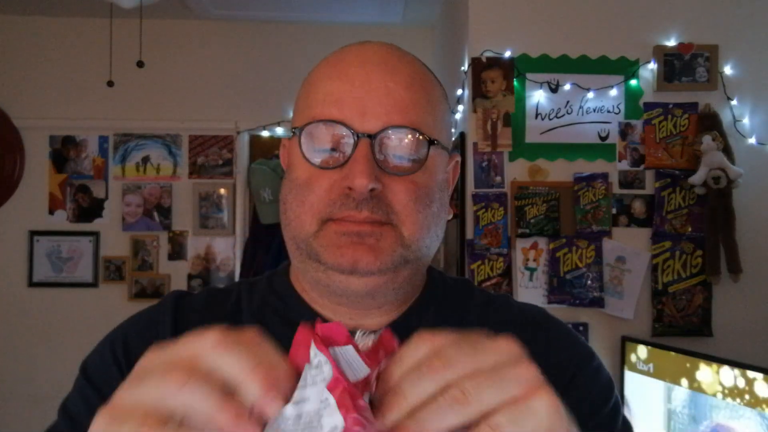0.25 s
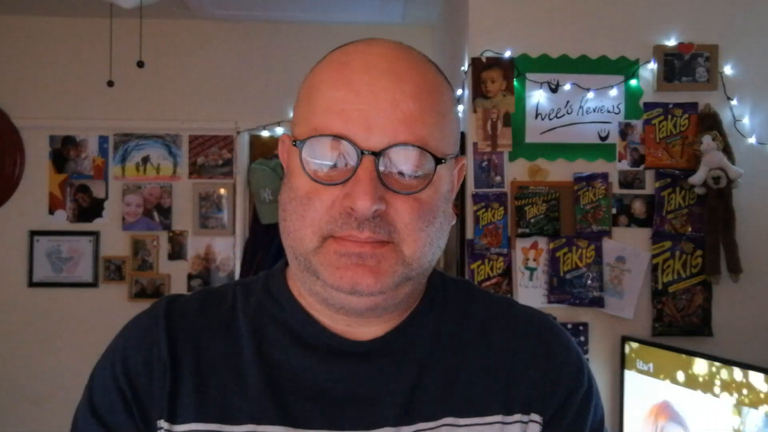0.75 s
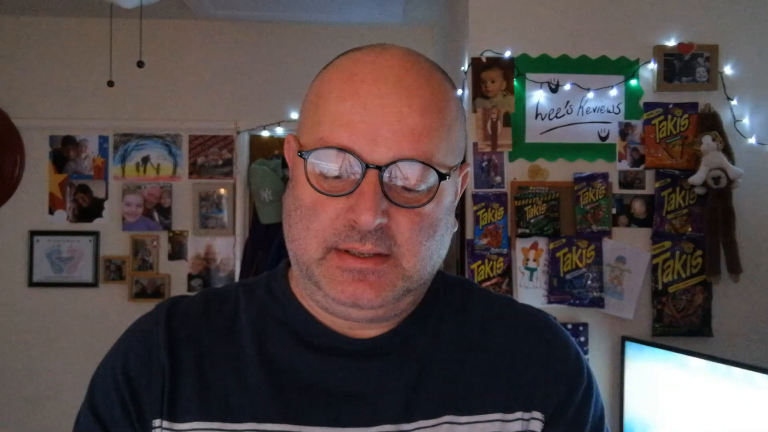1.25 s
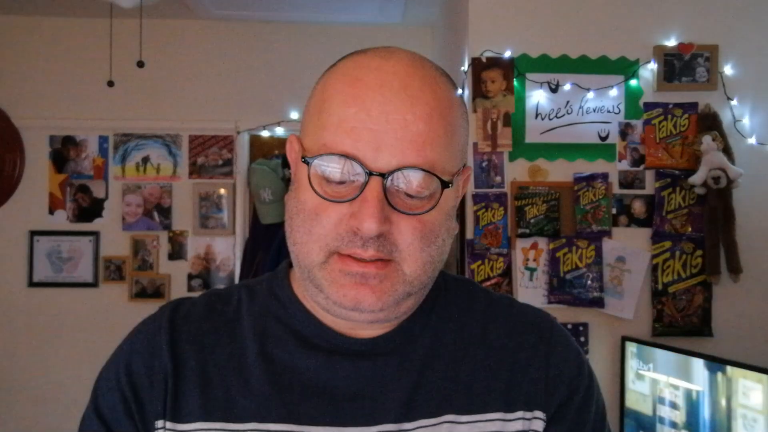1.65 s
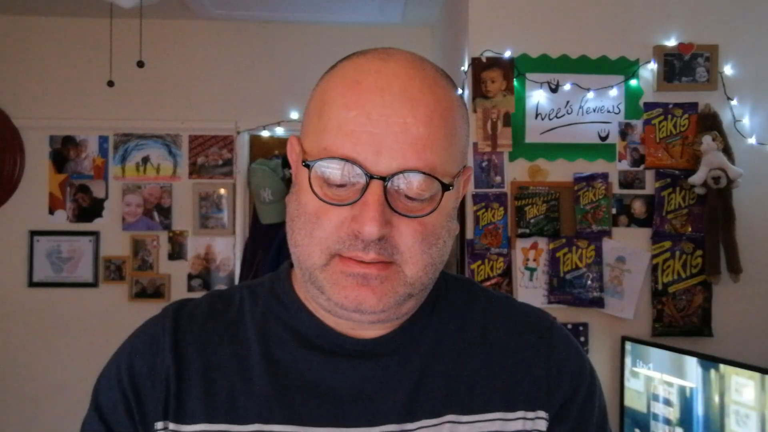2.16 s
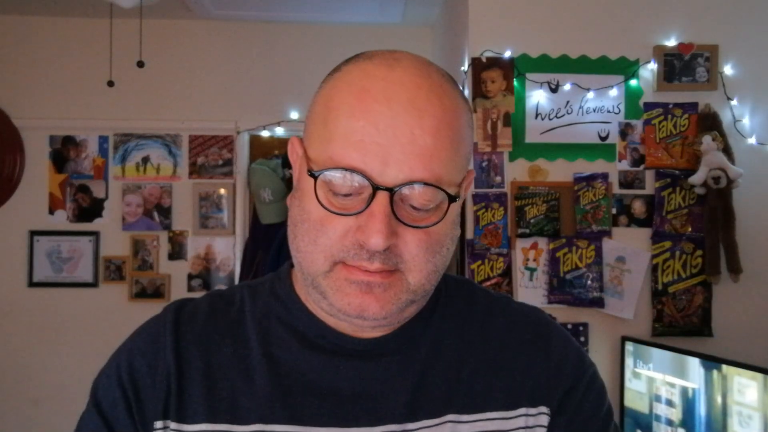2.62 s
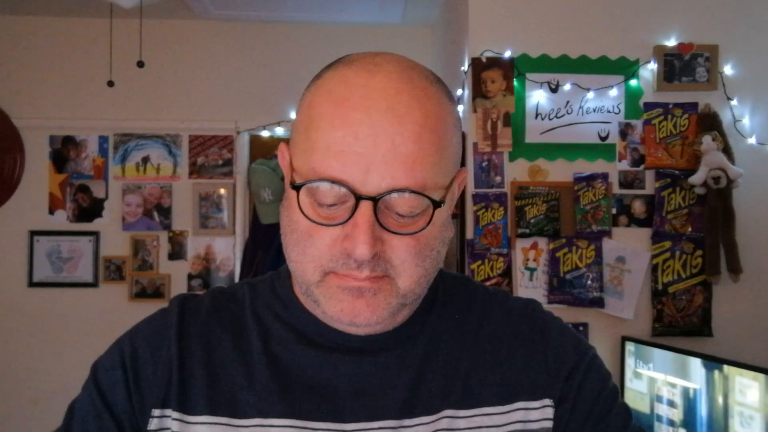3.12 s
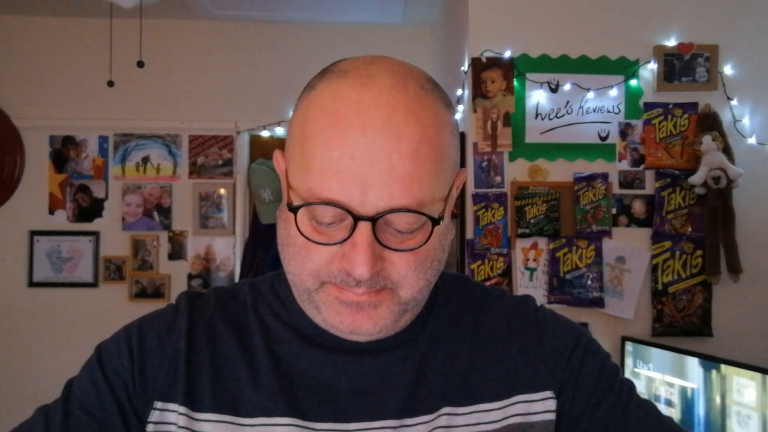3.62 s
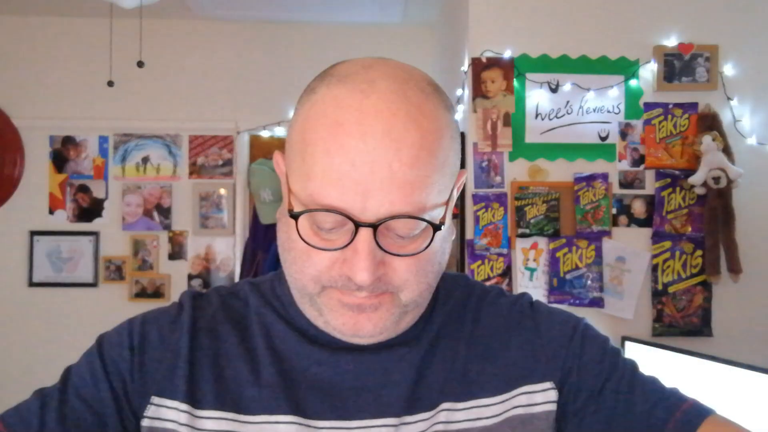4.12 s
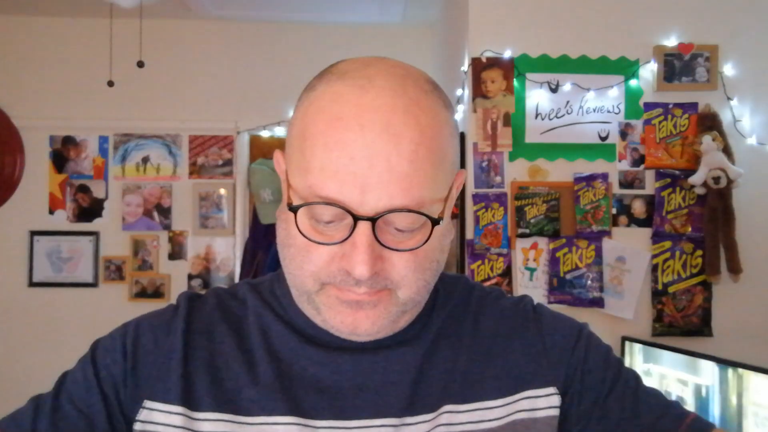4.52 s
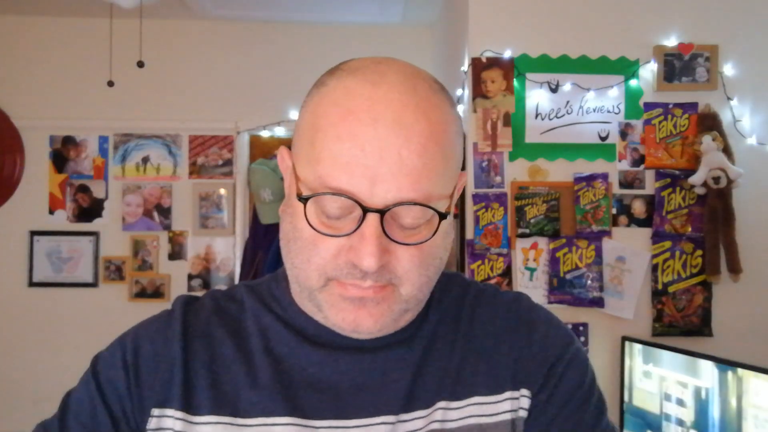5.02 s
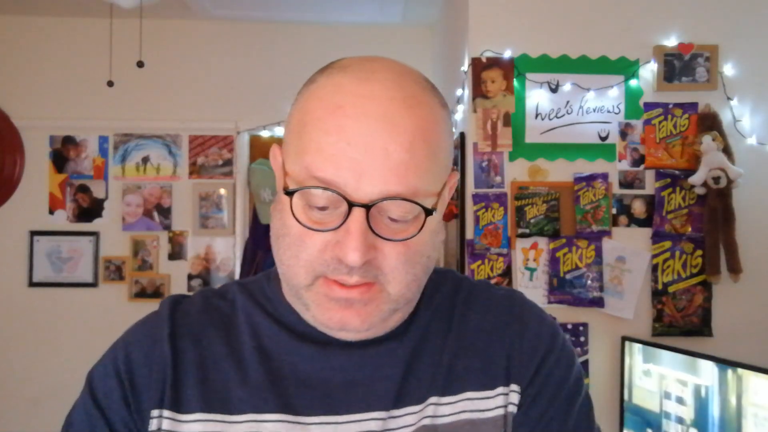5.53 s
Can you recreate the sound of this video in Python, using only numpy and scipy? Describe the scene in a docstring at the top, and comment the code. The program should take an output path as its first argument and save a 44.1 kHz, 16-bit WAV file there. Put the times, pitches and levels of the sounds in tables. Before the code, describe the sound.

Crisp foil crinkling, close and dry with a short room tail: bright ticks, hollow little pops and fizzing rattles as a bag is pulled open. A brief near-silence follows, leaving only faint hush, before sparser crackles return with low desk thrum and muted knocks. Busy clusters come near four seconds and again just after five.

```python
"""At a desk in a small room, a metallised snack packet is pulled open and handled close to a stereo microphone.
Snapping creases are short ticks, the film panels beside them pop, and bursts of smaller folds rattle after.
Squeezes of the fingers drive random damped folds (fine crackle to soft flexing), lesser snaps and desk thrum.
The pouch buckles as a short hollow ring; sliding sheets are shaped noise, a finger drag a sinking noise band.
Nudges of the desk are dull damped thuds; noise responses make the desk bounce and room tail over a faint hush."""
import sys
import numpy as np
from scipy import signal
from scipy.fft import rfft, irfft, next_fast_len
from scipy.io import wavfile

SR = 44100
rng = np.random.default_rng(int(sys.argv[2]) if len(sys.argv) > 2 else 0)


def wav_out(sig):
    """Save sig, one row per channel (or a flat mono array), as 16-bit PCM at SR to the path in sys.argv[1]."""
    wavfile.write(sys.argv[1], SR, np.round(np.clip(np.atleast_2d(sig).T, -1, 1) * 32767).astype(np.int16))


N = 254456

# loud creases snapping, levels relative:
# start_s, tick_level_db, tick_hz, pop_level_db, pop_hz, rattle_level_db
SNAPS = [(.032, -14.5, 2920, -31, 1860, -7), (.0605, -2.5, 5670, -20, 1120, -11.5),
         (.0966, -11.5, 3500, -10, 1740, -18.5), (.1347, -15, 4550, -24, 1750, -13),
         (.1733, -10, 8500, -16, 1150, -12), (.1935, -8, 6600, -12, 1080, -10),
         (.2573, -9.5, 4070, -10.5, 1140, -9), (.298, -9.5, 6800, -10.5, 1650, -2.5),
         (.3069, -7, 6040, -14, 1590, -8), (.3411, -2.5, 4400, -26, 1600, -5),
         (.3714, -13, 4400, -2.5, 1320, -3), (.4489, -14, 2630, -10.5, 1380, -33),
         (.4736, -11, 5320, -17, 1500, -11), (.5117, -13, 3360, -15, 1060, -10.5),
         (.5556, -11, 3860, -17, 1540, -5.5), (.5863, -5, 9200, -20, 1400, -5.5),
         (.6071, -7.5, 5400, -11.5, 1780, -1), (.7144, -11.5, 6070, -6, 1570, -4),
         (.7568, -9.5, 3800, -10, 950, -10.5), (.8258, -17, 6470, -13, 1850, -13.5),
         (.8835, -27, 6300, -10, 1520, -12), (.8922, -15, 3050, -7, 1470, -10),
         (.9184, -13, 6250, -7, 1310, -7), (.956, 0, 8400, -18, 1450, -16), (.968, -9, 7900, -39, 900, -25),
         (.9795, -16, 6350, -8.5, 1600, -2.5), (.9918, 1, 6230, -32, 1550, -16),
         (1.0562, -6, 7250, -10, 1610, -10), (1.1625, -14.5, 5130, -12.5, 1300, -19),
         (1.1928, -16, 7650, -10.5, 1470, -20), (1.2185, -10.5, 6500, -29, 1400, -9.5),
         (1.2379, -25, 5300, -10, 1580, -11.5), (1.2768, -21, 5100, -9.5, 1800, -3),
         (1.3128, -5, 6250, -12, 860, -10), (1.3492, -21, 6870, -15, 1250, -3.5),
         (1.3674, -5, 4540, -3, 1450, -4), (1.3921, -1, 7250, -15, 1450, -5),
         (1.464, -13, 8200, -36.5, 1700, -22), (1.4931, -12, 3430, -14, 1520, -11),
         (1.5692, -8.5, 7300, -29, 910, -8), (1.5834, -11, 4750, -18, 1500, -13),
         (1.6175, -4.5, 5700, -15, 1250, -4), (1.7089, -8.5, 4330, -15.5, 1240, 0.5),
         (1.7898, -11.5, 4900, -9, 1790, -9.5), (1.842, -9, 5500, -4, 1930, -8.5),
         (1.8678, -11, 4000, -18.5, 1790, -7.5), (1.9198, -4, 7840, -41, 2100, -13.5),
         (1.9865, -8.5, 7950, -32, 1450, -11.5), (2.0568, 3.5, 6740, -26, 1700, -11),
         (2.0687, -17, 6200, -14, 1700, -3.5), (2.138, -13, 3780, -18.5, 1100, -14),
         (2.232, -43, 4000, -30, 1440, -36), (2.349, -38, 3400, -32, 1210, -44),
         (2.4981, -8, 7900, -23, 1350, -11.5), (2.5651, -21, 2630, -14, 960, -22),
         (2.6289, -20, 4050, -25, 2150, -19), (2.7605, -4, 6100, -21, 1700, -10),
         (2.8337, -4.5, 6300, -11, 1290, -6), (2.8492, -6, 7430, -31, 1590, -11.5),
         (2.9146, -27.5, 4950, -14, 1250, -18), (2.9723, -20, 3650, -11, 860, -8.5),
         (3.0339, -19, 3350, -8.5, 1310, -16.5), (3.1367, -19, 6500, -6.5, 1340, -7),
         (3.2506, -20, 4340, -9.5, 1590, -16), (3.3752, -12, 8500, -19.5, 1300, -8),
         (3.4916, -18, 3380, -13.5, 1060, -12), (3.612, -20, 4860, -21, 1270, -15),
         (3.6812, -7.5, 7740, -26, 1350, -9.5), (3.7306, -15.5, 7540, -12.5, 1780, -8.5),
         (3.7482, -21, 5300, -11.5, 1650, -8), (3.7926, -27, 4900, -10.5, 850, -19),
         (3.8234, -18, 6400, -17.5, 1850, -13.5), (3.8953, -12, 4720, -33, 1800, -6.5),
         (4.0152, -7, 8000, -10, 1600, -16), (4.0239, -4, 9350, -5.5, 1930, -3.5),
         (4.0619, -12, 4550, -3.5, 1170, -0.5), (4.1776, -19.5, 4430, -15.5, 980, -16),
         (4.299, -26, 5800, -19.5, 1370, -26.5), (4.3346, -14.5, 2950, -10, 1600, -29),
         (4.3482, -12.5, 3700, -10.5, 1210, -7.5), (4.3726, -4.5, 6900, -15, 1640, -9.5),
         (4.4237, -8, 7660, -3.5, 1220, -4.5), (4.5647, -14.5, 4800, -10.5, 1040, -9),
         (4.7195, -17.5, 2920, -23, 2080, -17.5), (4.862, -41, 3500, -23, 2120, -23),
         (4.9469, -13.5, 7340, -18.5, 1500, -7), (4.9736, -17, 4000, -15, 1650, -17),
         (5.0013, -12, 4850, -17, 1300, -14), (5.0128, -13, 7050, -10.5, 1130, -19),
         (5.0229, -25, 6250, -14, 1270, -1), (5.079, -16, 7050, -13, 1420, -11),
         (5.1107, -9, 8500, -16.5, 1290, -12), (5.2243, -11, 7130, -22, 1690, -9),
         (5.2706, -14.5, 4130, -11, 1560, -12), (5.3113, -9.5, 3780, -9, 1740, -25),
         (5.3204, -4, 7750, -13, 1600, -3), (5.385, -10, 8040, -25, 1050, -10),
         (5.4995, -11.5, 7430, -16.5, 1360, -11.5), (5.5521, -28.5, 4280, -10.5, 1680, -8),
         (5.6029, -25, 4000, -2.5, 1450, -7), (5.6287, -4, 7970, -31, 1290, -14),
         (5.6912, -9.5, 3400, -17, 1510, -26), (5.7191, -22, 5940, -8.5, 970, -13.5),
         (5.7428, -20, 3360, -19.5, 1340, -11)]
# whole pouch buckling and pushing air: start_s, relative_level_db
BUCKLES = [(.099, -20), (.173, -20), (.88, -14), (1.316, -20), (1.616, -19), (2.03, -18), (4.07, -16),
           (5.111, -19), (5.469, -22), (5.719, -16.5)]
# spectral shape of the large folds: freq_hz, relative_db
FLEX_SHAPE = [(30, -35.5), (70, -13), (125, -3.5), (195, 2.5), (260, 2), (400, 3), (600, -2), (1000, -35.5)]
# spectral shape of the middling folds: freq_hz, relative_db
RUSTLE_SHAPE = [(300, -25.5), (550, -14.5), (800, -6), (1600, -4.5), (2300, -4), (4000, -32.5)]
# spectral shape of the tiny folds: freq_hz, relative_db
CRACKLE_SHAPE = [(700, -20), (1800, -10), (3000, 4.5), (5000, -4), (8500, 1.5), (10500, -6), (13000, -16),
                 (16000, -33)]
# spectral shape of the quiet room: freq_hz, relative_db
HUSH_SHAPE = [(20, 0), (60, -2.5), (130, -2.5), (300, -12), (1000, -17), (3000, -17.5), (9000, -35),
              (16000, -29.5)]
# colour of desk and microphone: freq_hz, gain_db
COLOUR = [(195, -1), (250, -5), (340, 4.5), (480, 2.5), (620, -5.5), (720, 2), (820, 2), (950, -4.5),
          (1160, 2), (1320, -4), (1530, 1.5), (1950, 0.5), (2350, -3.5), (3200, -3), (9000, -1), (11500, 0),
          (16000, 7)]
# left-right likeness: freq_hz, correlation (1 = identical)
LIKENESS = [(100, 1), (500, 0.38), (1200, 0.8), (3000, 0.27), (9000, 0.28)]
# decay of the room: freq_hz, t60_s
ROOM_DECAY = [(200, 0.27), (1500, 0.21), (7000, 0.24), (15000, 0.17)]
# film sliding over film: start_s, length_s, level_db
SLIDES = [(0.617, 0.015, -31.5), (2.008, 0.039, -34), (2.963, 0.23, -42.5), (3.303, 0.038, -37),
          (4.024, 0.08, -34.5), (4.338, 0.15, -35)]
# spectral shape of that rush: freq_hz, relative_db
RUSH_SHAPE = [(100, -8), (330, -6), (700, 5), (1500, -1.5), (2500, 4), (4500, 6), (8000, 3), (11000, -4),
              (16000, -24)]
# hands nudging the desk: start_s, relative_level_db
NUDGES = [(2.83, -36), (3.469, -47), (4.039, -47), (4.269, -40), (4.341, -38), (4.411, -47), (4.749, -46),
          (5.103, -49), (5.329, -50), (5.42, -45), (5.716, -33)]
# steady hold on the packet: time_s, effort_db
GRIP = [(0, -40.5), (1.1, -43.5), (1.45, -52.5), (1.88, -46), (1.96, -63.5), (2.14, -63), (2.2, -74.5),
        (2.32, -78), (2.39, -56), (2.46, -52), (3.1, -47), (3.235, -58.5), (3.32, -51), (3.6, -55),
        (3.9, -49.5), (4.52, -57), (4.68, -62), (4.74, -51.5), (4.9, -55.5), (5.2, -49), (5.48, -55.5),
        (5.77, -54)]
# squeezes of the fingers: start_s, length_s, effort_db, whole_pouch_extra_db
SQUEEZES = [(0.06, 0.14, -41.5, -7.5), (0.394, 0.02, -47.5, -0.5), (0.574, 0.055, -44.5, -10),
            (0.692, 0.067, -48, 3.5), (0.874, 0.13, -45, 1), (1.196, 0.15, -46, 7.5), (1.538, .11, -40, -3),
            (1.823, 0.056, -39, -6), (2.012, 0.05, -34.5, 0.5), (2.426, 0.096, -45.5, 0.5),
            (2.675, 0.036, -44, 3.5), (2.816, 0.39, -50, 8), (3.295, 0.14, -42.5, 4.5),
            (3.467, 0.086, -45.5, 7.5), (3.655, 0.06, -40.5, -0.5), (3.834, 0.045, -41, -0.5),
            (3.956, .05, -43.5, 4), (4.007, 0.069, -38.5, -2), (4.164, 0.058, -43.5, 1),
            (4.338, 0.15, -40.5, 1), (4.58, 0.032, -42, -1), (4.985, 0.049, -39, -10),
            (5.091, 0.031, -41, 6.5), (5.23, .19, -43, 4), (5.547, 0.032, -45.5, 8.5),
            (5.726, .06, -47.5, 10)]
# fingers dragging along the hollow pouch, one row: start_s, length_s, level_db, first_hz, last_hz
DRAG = (2.95, 0.06, -53, 360, 300)
# spectral shape of what the desk passes on: freq_hz, relative_db
THRUM_SHAPE = [(25, -1), (60, -10.5), (110, 0.5), (150, -7.5), (260, -32), (1000, -79)]

TOP_HZ = 16100  # band limit
SQUEEZE_ATTACK_S, SQUEEZE_RELEASE_S = 0.008, 0.017
ON_DESK_S = 2.5  # the packet rests on the desk from here


def amp(db):
    """Gain of a level in dB."""
    return 10 ** (np.asarray(db) / 20)


def unit(x):
    """Scale to rms 1."""
    return x / np.sqrt(np.mean(x ** 2) + 1e-20)


def burst(x):
    """Scale a short sound to a mean energy of 1 per channel."""
    return unit(x) / np.sqrt(x.shape[-1])


def along(points, hz):
    """Interpolate (freq_hz, value) points on a log frequency axis."""
    point_hz, value = np.transpose(points)
    return np.interp(np.log(hz + 1), np.log(point_hz + 1), value)


def filtered(x, response):
    """Apply a response given as a function of frequency."""
    n = x.shape[-1]
    padded = next_fast_len(n + 1024)
    spectrum = rfft(x, padded) * response(np.fft.rfftfreq(padded, 1 / SR))
    return irfft(spectrum, padded)[..., :n]


def coloured(x, points):
    """Minimum-phase filter with the gain of the (freq_hz, gain_db) points."""
    size = 4096
    gain = amp(along(points, np.fft.rfftfreq(size, 1 / SR)))
    # folding the cepstrum makes the filter causal
    cepstrum = irfft(np.log(gain))
    cepstrum[1:size // 2] *= 2
    cepstrum[size // 2 + 1:] = 0
    impulse = irfft(np.exp(rfft(cepstrum)))
    return signal.fftconvolve(x, impulse[None], axes=1)[:, :x.shape[1]]


def noise(channels=2, size=N):
    """White noise."""
    return rng.standard_normal((channels, size))


def spread(pair):
    """Mix two unrelated signals into left and right with the correlation of LIKENESS."""
    def mid_side_gains(hz):
        angle = np.arccos(np.clip(along(LIKENESS, hz), 0, 1)) / 2
        return np.array([np.cos(angle), np.sin(angle)])

    mid, side = filtered(pair, mid_side_gains)
    return np.array([mid + side, mid - side])


def placed(x, lag_s, pan_db):
    """Place a point source: left lags by lag_s and is pan_db louder."""
    sides = np.array([[1], [-1]]) / 2
    delayed = filtered(x, lambda hz: np.exp(-2j * np.pi * hz * lag_s * sides))
    return delayed * amp(pan_db * sides)


def add(track, start_s, x):
    """Mix x into the track in place."""
    part = track[:, max(round(start_s * SR), 0):][:, :x.shape[-1]]
    part += x[..., :part.shape[1]]


def blank(length_s):
    """An empty stereo track and the time axis of one short event."""
    return np.zeros((2, N)), np.arange(int(SR * length_s)) / SR


def ring(t, hz, life_cycles, rise_cycles):
    """Damped sine of energy 1 with a soft onset."""
    swing = np.sin(2 * np.pi * hz * t)
    return burst(swing * np.exp(-hz * t / life_cycles) * (1 - np.exp(-hz * t / rise_cycles)))


def flick(t, hz, life_cycles):
    """Wave packet of energy 1; its smooth swell keeps it in its own band."""
    age = hz * t / life_cycles
    return burst(np.sin(2 * np.pi * hz * t) * age ** 2 * np.exp(-age))


def grains(shape, rate_per_s, scatter_db, hiss, hz, pitch_spread, size=N):
    """Folds flip at random as damped sines of random pitch and size, over film hiss; rms 1."""
    count = int(rate_per_s * size / SR) + 1
    when, side = rng.random((2, count))
    strength, pitch, sign = rng.standard_normal((3, count))
    t = np.arange(int(3 * SR / hz)) / SR
    fold_hz = hz * np.exp(pitch_spread * np.clip(pitch, -2, 1.5))
    cycles = fold_hz[:, None] * t
    size_gain = np.sign(sign) * amp(scatter_db * np.minimum(strength, 2))
    swings = np.sin(2 * np.pi * cycles) * np.exp(-cycles) * size_gain[:, None]
    # folds running past the end wrap to the start
    places = ((when * size).astype(int)[:, None] + np.arange(len(t))) % size
    places += size * (side < .5)[:, None]
    flips = np.bincount(places.ravel(), swings.ravel(), 2 * size).reshape(2, size)
    pair = unit(coloured(flips, shape)) + hiss * unit(coloured(noise(size=size), shape))
    return unit(spread(pair))


def piece(texture, t):
    """Cut a random stretch of a texture, as long as t."""
    start = int(rng.random() * (texture.shape[1] - len(t)))
    return texture[:, start:start + len(t)]


def tinted(x, centre_hz, depth_db=3.0, ripple_db=2.5, count=24):
    """Stress the octave around a frequency; each patch of film adds chance resonances."""
    ripple = np.column_stack([np.geomspace(500, TOP_HZ, count), ripple_db * rng.standard_normal(count)])

    def response(hz):
        octaves = np.log2((hz + 1) / centre_hz)
        return amp(depth_db * np.exp(-2 * octaves ** 2) + along(ripple, hz))

    return filtered(x, response)


def snaps(tick_db=2, second_db=-6, pop_db=-3, flutter_db=-4, rattle_db=2, rattle_delay_s=0.001001,
          rattle_t60_s=0.044, flutter_t60_s=0.05, tick_top_hz=12800, typical_hz=6000, deep_ring_power=0.81):
    """A crease ticks, the panel beside it pops and flutters, nearby folds rattle at kindred pitches."""
    out, t = blank(1 / 20)
    folds = grains(CRACKLE_SHAPE, rate_per_s=3000, scatter_db=0.5, hiss=0.97, hz=6600,
                   pitch_spread=0.59, size=SR)
    panels = grains(RUSTLE_SHAPE, rate_per_s=1600, scatter_db=2.0, hiss=0.87, hz=1516,
                    pitch_spread=0.48, size=SR)
    tick_lowpass = signal.butter(2, tick_top_hz, fs=SR)
    creases = list(SNAPS) + small_snaps()
    chances = rng.standard_normal((len(creases), 4))
    for crease, (lag, pan, life, bend_shape) in zip(creases, chances):
        start_s, tick_level, tick_hz, pop_level, pop_hz, rattle_level = crease
        # the crease bends in two ways at once; its shape sets the second pitch
        second_hz = min(tick_hz * 0.74 * np.exp(0.39 * bend_shape), TOP_HZ / 2)
        # ticks below typical_hz last more cycles
        tick_cycles = .38 * np.exp(0.31 * life) * max(typical_hz / tick_hz, 1) ** deep_ring_power
        bend = flick(t, tick_hz, tick_cycles)
        bend = bend + amp(second_db) * ring(t, second_hz, life_cycles=2.9, rise_cycles=0.94)
        tick = amp(tick_level + tick_db) * burst(signal.lfilter(*tick_lowpass, bend))

        pop = amp(pop_level + pop_db) * flick(t, pop_hz, 0.61 * np.exp(-.25 * life))
        flutter = burst(tinted(piece(panels, t), pop_hz) * amp(-60 * t / flutter_t60_s))
        flutter *= amp(pop_level + flutter_db)
        rattle = burst(tinted(piece(folds, t), tick_hz) * amp(-60 * t / rattle_t60_s))
        rattle *= amp(rattle_level + rattle_db)

        # every crease faces the microphone a little differently
        point = placed(tick + pop, lag_s=2.2e-5 + 1.2e-5 * lag, pan_db=0.4 + 0.82 * pan)
        add(out, start_s, point + flutter)
        add(out, start_s + rattle_delay_s, rattle)
    return out


def small_snaps(count=110, tick_db=23.5, pop_db=20.5, rattle_db=22.0, scatter_db=4.5,
                tick_hz=5700, pop_hz=1450, tick_spread=0.38, pop_spread=.22):
    """Lesser creases give way at random, as strongly as the film is worked; rows as in SNAPS."""
    when = (np.arange(count) + 2 * rng.random(count)) / (count + 1)
    tick, pop, rattle, crease, panel = np.clip(rng.standard_normal((count, 5)), -1.5, 1.5).T
    effort_db = 20 * np.log10(effort()[(when * (N - 1)).astype(int)])
    return list(zip(when * N / SR,
                    effort_db + tick_db + scatter_db * tick, tick_hz * np.exp(tick_spread * crease),
                    effort_db + pop_db + scatter_db * pop, pop_hz * np.exp(pop_spread * panel),
                    effort_db + rattle_db + scatter_db * rattle))


def buckles(level_db=-3.0, typical_hz=420):
    """The pouch gives way with a short hollow push: a heavily damped ring."""
    out, t = blank(1 / 20)
    for (start_s, db), pitch in zip(BUCKLES, rng.standard_normal(len(BUCKLES))):
        push = ring(t, typical_hz * np.exp(.07 * pitch), life_cycles=0.72, rise_cycles=0.48)
        add(out, start_s, amp(db + level_db) * push)
    return out


def crinkle(flex_db=-16.0, rustle_db=-5.5, crackle_db=-0.5, rustle_share=.6):
    """Large, middling and tiny folds shift under the fingers; the larger follow the pouch more."""
    flex = grains(FLEX_SHAPE, rate_per_s=140, scatter_db=5.5, hiss=0.92, hz=238, pitch_spread=0.54)
    rustle = grains(RUSTLE_SHAPE, rate_per_s=400, scatter_db=4.0, hiss=0.63, hz=1400, pitch_spread=0.52)
    crackle = grains(CRACKLE_SHAPE, rate_per_s=900, scatter_db=4.0, hiss=0.65, hz=5270, pitch_spread=0.43)
    return (amp(flex_db) * effort(pouch_share=1) * flex
            + amp(rustle_db) * effort(rustle_share) * rustle
            + amp(crackle_db) * effort() * crackle)


def effort(pouch_share=0):
    """How hard the film is worked, as a gain: squeezes swell, hold and relax over the steady grip."""
    t = np.arange(0, N, 64) / SR
    start_s, length_s, db, pouch_db = np.transpose(SQUEEZES)[:, :, None]
    before = np.maximum(start_s - t, 0) / SQUEEZE_ATTACK_S
    after = np.maximum(t - start_s - length_s, 0) / SQUEEZE_RELEASE_S
    swell = np.exp(-np.minimum(before + after, 20))
    squeezing = np.linalg.norm(amp(db + pouch_share * pouch_db) * swell, axis=0)
    grip = amp(np.interp(t, *np.transpose(GRIP)))
    return np.interp(np.arange(N) / SR, t, np.hypot(grip, squeezing))


def slides(rise_s=0.011, fade_s=0.006):
    """Sheets rub past each other in a smooth rush of shaped noise."""
    t = np.arange(N) / SR
    rubbing = np.zeros(N)
    for start_s, length_s, db in SLIDES:
        rise = (t - start_s) / rise_s
        fade = (start_s + length_s - t) / fade_s + .5
        rubbing += amp(db) * np.clip(np.minimum(rise, fade), 0, 1)
    return rubbing * unit(coloured(spread(noise()), RUSH_SHAPE))


def drag(half_width_hz=45, edge_s=0.026):
    """Rubbing fingers stir the air in the pouch; its hollow note sinks as the pouch opens."""
    start_s, length_s, db, first_hz, last_hz = DRAG
    out, t = blank(1 / 2)
    stir = unit(signal.lfilter(*signal.butter(2, half_width_hz, fs=SR), noise(size=len(t))))
    phase = 2 * np.pi * np.cumsum(np.interp(t, [0, length_s], [first_hz, last_hz])) / SR
    stroke = amp(db) * np.clip(np.minimum(t, length_s - t) / edge_s, 0, 1)
    # slow noise on both quadratures gives a noise band around the note
    add(out, start_s, stroke * (stir[0] * np.cos(phase) + stir[1] * np.sin(phase)))
    return out


def nudges(level_db=9, thud_hz=115):
    """Dull damped thuds through the desk top, alike in both channels."""
    out, t = blank(1 / 8)
    for (start_s, db), pitch in zip(NUDGES, rng.standard_normal(len(NUDGES))):
        thud = ring(t, thud_hz * np.exp(.08 * pitch), life_cycles=1.9, rise_cycles=0.74)
        add(out, start_s, amp(db + level_db) * thud)
    return out


def thrum(level_db=-21, follow_power=0.88, full_effort_db=-42):
    """The desk top carries the working of the hands as bass noise, alike in both channels."""
    contact = np.clip((np.arange(N) / SR - ON_DESK_S) * 10, 0, 1)
    full = amp(full_effort_db)
    push = full * (effort(pouch_share=0.62) / full) ** follow_power
    return amp(level_db) * contact * push * unit(coloured(noise(channels=1), THRUM_SHAPE))


def room(x, desk_db=-13, desk_delay_s=.0026, desk_t60_s=0.0026, tail_db=-9, tail_delay_s=.004):
    """A scattered desk bounce, then a short tail; both are redrawn as the packet moves."""
    out, t = blank(1 / 3)
    hop = SR // 6
    for start in range(0, N, hop):
        part = x[:, start:start + hop].mean(0, keepdims=True)
        bounce = burst(spread(noise(size=len(t))) * amp(-60 * t / desk_t60_s))
        # each frequency of the tail decays at its own rate
        hz, age_s, bins = signal.stft(spread(noise(size=len(t))), SR, nperseg=256)
        decay = amp(-60 * age_s / along(ROOM_DECAY, hz)[:, None])
        tail = burst(signal.istft(bins * decay, SR, nperseg=256)[1])
        add(out, start / SR + desk_delay_s, amp(desk_db) * signal.fftconvolve(part, bounce, axes=1))
        add(out, start / SR + tail_delay_s, amp(tail_db) * signal.fftconvolve(part, tail, axes=1))
    return out


def hush(level_db=-68.5):
    """Steady background noise: a low rumble and a faint hiss."""
    return amp(level_db) * unit(coloured(spread(noise()), HUSH_SHAPE))


def scene(radiates_above_hz=130):
    """The light film radiates little bass; the deepest sounds come from the desk and the room."""
    packet = snaps() + buckles() + crinkle() + slides() + drag()
    packet = signal.lfilter(*signal.butter(2, radiates_above_hz, "high", fs=SR), packet)
    left_right_db = [[-1.5], [1]]
    return (packet + room(packet)) * amp(left_right_db) + nudges() + thrum() + hush()


def record(dry, low_cut_hz=30):
    """Desk and microphone colour the sound; the deepest bass and all above TOP_HZ are lost."""
    return filtered(coloured(dry, COLOUR), lambda hz: (hz < TOP_HZ) * hz / np.hypot(hz, low_cut_hz))


dry = scene()
out = record(dry)
wav_out(out)
```